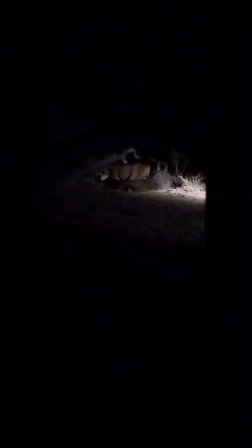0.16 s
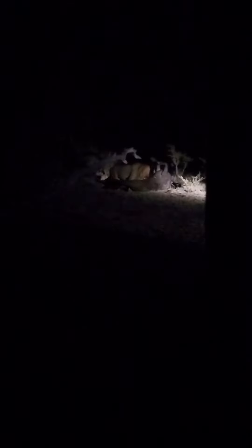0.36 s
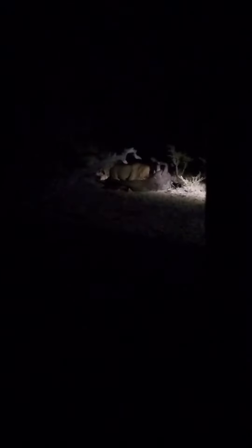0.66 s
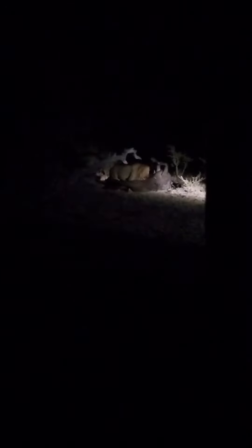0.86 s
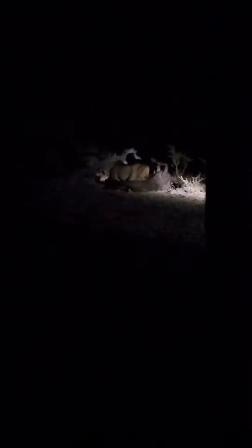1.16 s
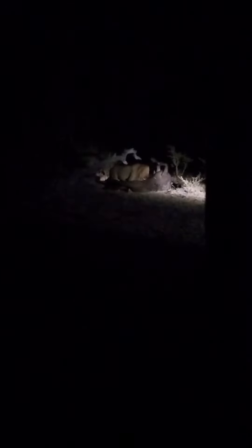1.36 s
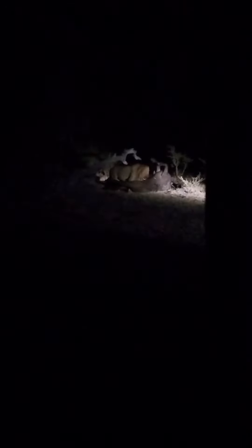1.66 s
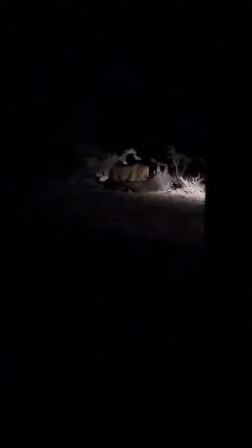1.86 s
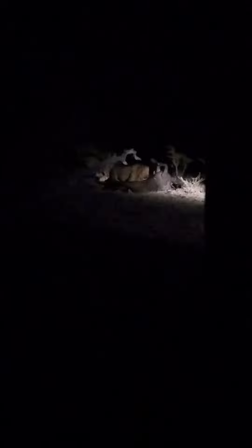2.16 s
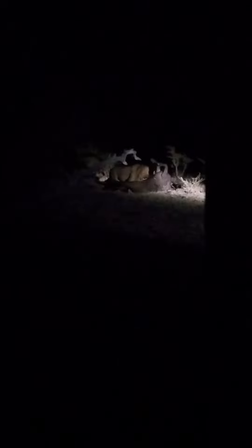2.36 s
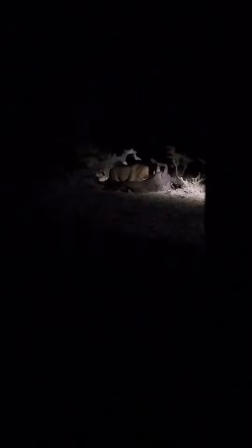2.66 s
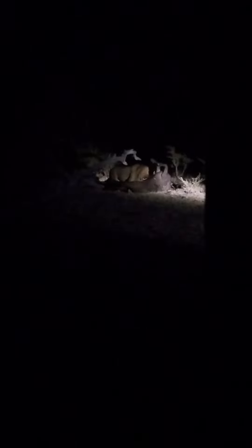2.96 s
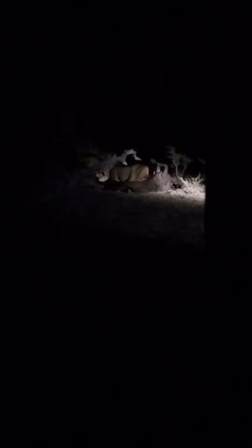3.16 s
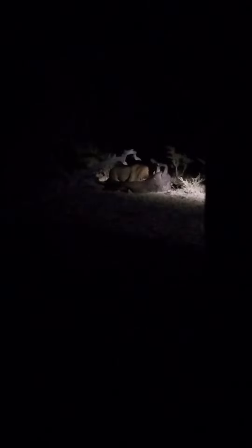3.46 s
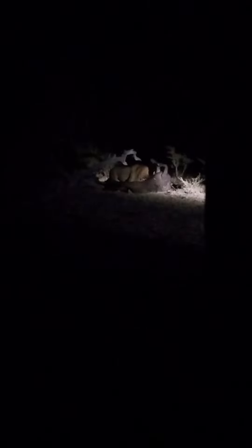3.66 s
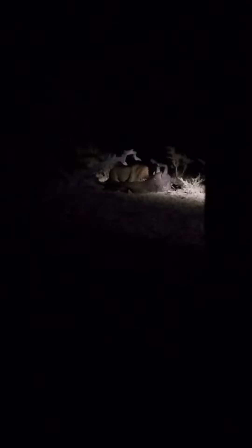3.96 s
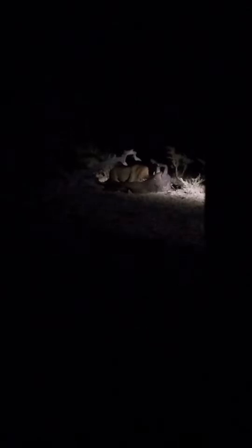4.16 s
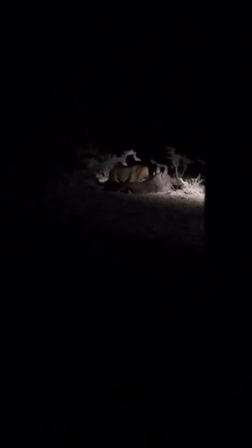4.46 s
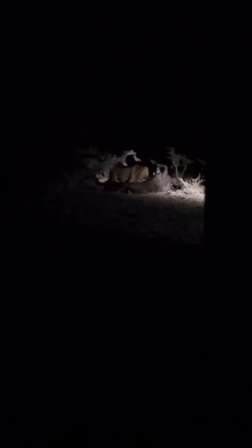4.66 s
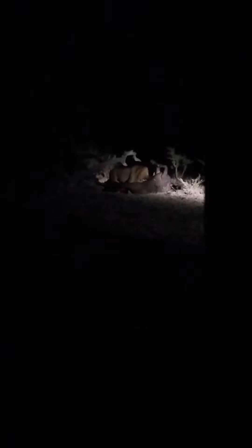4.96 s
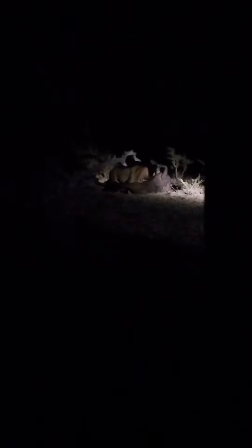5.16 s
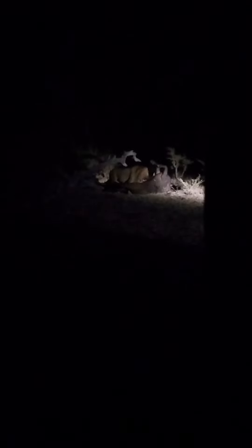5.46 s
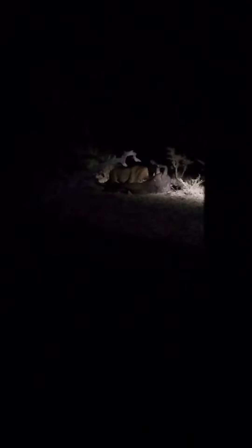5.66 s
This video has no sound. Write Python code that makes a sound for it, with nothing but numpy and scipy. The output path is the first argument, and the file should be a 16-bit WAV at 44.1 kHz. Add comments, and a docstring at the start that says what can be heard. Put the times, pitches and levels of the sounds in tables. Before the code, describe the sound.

Night outdoors, quiet low rumble and soft hush, with a barely audible, very high thin whine throughout. A lion, central and close, exhales softly from 0 to 0.45 s. At about 0.47 s it breaks into a violent open-jawed snarl: irregular hard throat snaps, chest thumps, ringing roary rasp and wet hissing spit, strongest around 0.5-1.1 s, briefly easing, then hitting again at 1.4 s and 1.7-1.9 s. As the jaws close, the snarl runs into deep rapid fluttering, about 25-30 beats a second, fading by 2.4 s. Light breath follows. At 2.9 s a darker, muffled growl builds, peaks near 3.1 s at about 20 beats a second and ebbs until 3.5 s. Faint distant falling chirps occur near 2.8, 3.5, 3.9, 4.7 and 5.7 s. Soft breathing fills the lull; from 4.9 s a much quieter growl swells to 5.3 s, slowing and fading.

```python
"""Soft breath over a low night rumble, then a lion snarls with open jaws as it guards its kill at night.
Its vocal folds snap shut unevenly: each closure is an impulse that sets the vocal tract ringing.
The jaws close and slack folds flap 14 to 32 times a second, in deep growls that build and ebb.
Turbulent breath noise drives the same tract resonances and hisses at the teeth.
Behind are shaped noise (the night), a thin high sine (a whine) and gliding sines (far, falling chirps)."""
import sys
import numpy as np
from scipy import signal
from scipy.fft import rfft, irfft
from scipy.io import wavfile
from scipy.ndimage import uniform_filter1d

SR = 44100
rng = np.random.default_rng(int(sys.argv[2]) if len(sys.argv) > 2 else 0)


def output_pcm(signal):
    """Save a mono or channel-first signal as 16-bit PCM at the path in sys.argv[1].

    Samples are clipped to [-1, 1] before scaling.
    """
    pcm = np.clip(np.atleast_2d(signal).T, -1, 1) * 32767
    wavfile.write(sys.argv[1], SR, np.round(pcm).astype(np.int16))


N = 255780
TIME = np.arange(N) / SR   # [s]
AGE = np.arange(SR // 5) / SR   # time since a pulse began [s]
ONSET = SR // 50   # pulses are levelled by the rms of their first 20 ms [samples]

# damping and strength of the six tract resonances, two of the throat, then four of the mouth:
# (bandwidth [Hz], relative level with jaws open [dB], relative level with jaws nearly shut [dB])
TRACT_MODES = [(21.6, -0.5, -10), (21.03, 0.5, -2.5), (23, 8, 7.5), (45.8, 6.5, 1), (65, 3, -10.5),
               (54.3, -3, -4)]
# spectrum of the hiss at the teeth: (frequency [Hz], relative density [dB per Hz])
TEETH_HISS = [(1500, -32.5), (2100, -4.5), (2600, -3.5), (3200, 0.5), (3900, -3.5), (5500, -4),
              (7500, -7.5), (10000, -12.5), (13000, -20.5), (15500, -35.5)]


def from_db(db):
    """An amplitude ratio is ten to the power of its level over twenty."""
    return 10 ** (np.asarray(db) / 20)


def rms_one(x):
    """Dividing by the root mean square normalises the mean power to 1."""
    return x / np.sqrt(np.mean(x ** 2) + 1e-20)


def butter(x, hz, kind, order=2):
    """A causal Butterworth filter has a maximally flat passband."""
    return signal.sosfilt(signal.butter(order, hz, kind, fs=SR, output="sos"), x)


def noise(spectrum):
    """Weighting the spectrum of white noise colours it; the result has rms 1."""
    hz, db = np.transpose(spectrum)
    f = np.maximum(np.fft.rfftfreq(N, 1 / SR), 1)
    density_db = np.interp(np.log(f), np.log(hz), db)
    below_first = np.minimum(f / hz[0], 1) ** 2   # roll-off under the lowest listed frequency
    gain = from_db(density_db) * below_first
    return rms_one(irfft(rfft(rng.standard_normal(N)) * gain, N))


def drift(rate):
    """Joining random values (unit spread), rate of them a second, gives a slow random modulation."""
    knots = rng.standard_normal(N // 20)
    return np.interp(TIME * rate, np.arange(len(knots)), knots)


def steady(x, span):
    """Dividing by the running rms over span seconds levels the random swells of a noise; rms about 1."""
    running_power = np.abs(uniform_filter1d(x * x, max(int(span * SR), 1)))
    return x / np.sqrt(running_power + 1e-12)


def add(out, s, sound):
    """Sounds superpose linearly: sum one in from time s."""
    i = int(s * SR)
    out[i:i + len(sound)] += sound[:N - i]


def at_level(pulse, db):
    """The level of a transient is set by the rms of its onset."""
    return from_db(db) * pulse / np.sqrt(np.mean(pulse[:ONSET] ** 2) + 1e-20)


def resonate(drive, hz, width_hz):
    """A damped oscillator with gliding centre: a unit click starts a decaying cosine of height 1."""
    turn = np.exp(2j * np.pi * np.cumsum(hz) / SR)
    decay = np.exp(-np.pi * width_hz / SR)   # per sample
    return np.real(turn * signal.lfilter([1], [1, -decay], drive / turn))


def scatter(x, t60, dull_hz):
    """Diffuse return from trees and ground: convolution with decaying noise of unit energy, low-passed."""
    age = np.arange(SR) / SR
    tail = rng.standard_normal(SR) * from_db(-60 * age / t60) * (1 - np.exp(-age / 0.013))
    tail = tail / np.sqrt(np.sum(tail ** 2))
    return butter(signal.fftconvolve(x, tail)[:N], dull_hz, "low")


def night():
    """Stationary noise with most power in the bass: a rumble and hush that swell a little."""
    # (frequency [Hz], relative density [dB per Hz])
    night_spectrum = [(25, 5), (60, -1.5), (140, -15.5), (370, -21), (600, -26), (1500, -36.5),
                      (3500, -43.5), (5700, -44), (9000, -47.5), (15500, -47)]
    night_db = -52.5
    swell_db = 0.71 * drift(1.8)
    return from_db(night_db) * noise(night_spectrum) * from_db(swell_db)


def whine():
    """A pure tone of constant amplitude: thin, steady and near the top of hearing."""
    # (frequency [Hz], rms level [dB])
    tones = [(14411, -91)]
    return sum(from_db(db) * rms_one(np.sin(2 * np.pi * hz * TIME)) for hz, db in tones)


def far_chirps():
    """Frequency-modulated sines: trembling calls that arch and fall, smeared by the bush they pass through."""
    # (start [s], top pitch before trembling [Hz], fall by 0.88 of the length [Hz], length [s],
    #  peak level before direct and scattered shares [dB])
    calls = [(2.785, 3590, 676, 0.071, -57), (3.499, 4530, 247, 0.053, -64.5),
             (3.948, 3760, 1284, 0.14, -61.5), (4.722, 3850, 993, 0.12, -64.5),
             (5.669, 3700, 600, 0.12, -64.5)]
    out = np.zeros(N)
    for s, top_hz, fall_hz, length, db in calls:
        u = np.clip((TIME - s) / length, 0, 1)   # progress through the call
        arch_hz = top_hz - fall_hz * ((u - .3) / 0.58) ** 2
        tremble_hz = 270 * drift(710)
        tone = np.sin(2 * np.pi * np.cumsum(arch_hz + tremble_hz) / SR)
        out += from_db(db) * np.sqrt(np.abs(np.sin(np.pi * u))) * tone
    return 0.54 * out + 0.62 * scatter(out, t60=0.32, dull_hz=5900)


def tract_hz(t):
    """Jaws, tongue and lips reshape the tract and so shift each resonance; frequencies at the times t."""
    # (untuned frequency with jaws open [Hz], with jaws nearly shut [Hz],
    #  exponent of throat tuning [1], exponent of mouth tuning [1])
    resonances = [(231.9, 215.6, 0.96, 0.097), (432.8, 398, -.1, 0), (775.6, 720, 0, 1),
                  (1009, 1150, 0, -.15), (1241, 1256, -0.13, .8), (1690, 2080, -0.11, .3)]
    # jaws go from open to nearly shut: (start [s], end [s])
    jaws_close = (1.62, 1.986)
    # tongue and lips: (time [s], throat tuning ratio [1], mouth tuning ratio [1])
    tuning = [(0.499, 1.33, 1.11), (.64, 0.74, 0.85), (.73, 1.01, 0.9), (0.779, 1.4, 0.98),
              (.86, 0.98, 0.88), (0.912, 0.98, 1.16), (0.958, 1, 0.87), (1.046, 0.89, .88),
              (1.076, 1.09, 1.12), (1.2, 1.0, 1.12), (1.38, 1.144, 1.012), (1.61, 1.25, 1.12),
              (1.862, 1.02, 1.326), (1.98, 1.35, 0.94), (2.15, 1.14, 0.95), (2.37, 0.96, 0.88),
              (2.93, 0.97, 1.11), (3.12, 0.69, .99), (3.499, 0.81, 0.94), (4.4, 1.1, 1.14),
              (4.95, 1.2, 1.85), (5.2, 0.85, 1.74), (5.32, 1.21, 1.56)]
    s, *ratios = np.transpose(tuning)
    throat, mouth = [np.interp(t, s, ratio) for ratio in ratios]
    shut = np.interp(t, jaws_close, [0, 1])
    return [(open_hz + shut * (shut_hz - open_hz)) * throat ** by_throat * mouth ** by_mouth
            for open_hz, shut_hz, by_throat, by_mouth in resonances]


def tract_ring(s, jaw):
    """Impulse response of throat and mouth: damped cosines after a closure; jaw 0 is open, 1 nearly shut."""
    rings = []
    for hz, (width_hz, *level_db) in zip(tract_hz(s + AGE), TRACT_MODES):
        phase = 2 * np.pi * np.cumsum(hz) / SR
        gain = from_db(level_db[jaw] + 2 * rng.normal())   # closures differ by chance
        rings.append(gain * np.exp(-np.pi * width_hz * AGE) * np.cos(phase))
    return sum(rings[:2]), sum(rings[2:])


def chest_thump(hz, swell, lead):
    """Air through the folds swells before closure (lead seconds in), then swings as a damped oscillation."""
    wave = AGE ** 2 * np.exp(-AGE / swell) * np.cos(2 * np.pi * hz * (AGE - lead))
    after_closure = wave[int(lead * SR):][:ONSET]
    return wave / np.sqrt(np.mean(after_closure ** 2))


def muzzle(drive, stretch):
    """A longer cavity resonates lower: stretching the muzzle divides all its high resonances alike."""
    # (frequency at stretch 1 [Hz], bandwidth [Hz], relative level [dB])
    muzzle_modes = [(2450, 220, 8.5), (2930, 62, -10), (3220, 48, -2), (4910, 140, -0.5), (5600, 160, -6.5),
                    (7100, 450, -4.5)]
    rings = []
    for hz, width_hz, db in muzzle_modes:
        ring = resonate(drive, np.full(len(drive), hz / stretch), width_hz)
        rings.append(from_db(db) * np.sqrt(width_hz) * ring)
    return sum(rings)


def spit(hiss, s, swell, plain):
    """A burst of turbulence around one closure, partly plain hiss, partly ringing in the muzzle."""
    puff = np.roll(hiss, rng.integers(N))[:len(AGE)] * AGE * np.exp(-AGE / swell)
    stretch = np.interp(s, [3.5, 5.3], [1, 1.07])   # the head is lowered for the last growl
    return at_level(muzzle(puff, stretch), 0) + plain * at_level(puff, 0)


def saliva(per_s, width_hz, spread_db):
    """Films of saliva tear at random times; each rings as a brief damped oscillator at its own pitch."""
    out = np.zeros(N)
    age = AGE[:2 * ONSET]
    for when, pitch, size, phase in rng.random((int(per_s * N / SR), 4)):
        hz = 1600 * 5.0 ** pitch
        envelope = (1 - np.exp(-age / 0.0024)) * np.exp(-np.pi * width_hz * age)
        ring = envelope * np.cos(2 * np.pi * (hz * age + phase))
        add(out, when * N / SR, from_db(spread_db * size - 8.0 * pitch) * ring)
    return steady(out, 0.029)


def fold_beats():
    """Listed flapping rates time the beats, and effort sets their levels; yields (time, then four dB)."""
    # (time of greatest effort [s], build-up [dB/s], ebb [dB/s], ebb of the mouth [dB/s], then
    #  relative levels at greatest effort: chest [dB], throat [dB], mouth [dB], spit [dB])
    growls = [(1.949, 98, 172, 30, -22, -36, -58, -47.5), (2.2, 84, 96, 100, -22.5, -27, -38.5, -50),
              (3.121, 98, 41.5, 10, -24.5, -32.5, -50.5, -55.5), (5.33, 54, 64, 43, -37.5, -46, -61, -60.5)]
    # one curve for each stretch of growling; the first two run on as one growl:
    # (time [s], flapping rate [beats/s])
    flap_rates = [
        [(1.911, 26.1), (1.949, 31.6), (2.02, 30)],
        [(2.043, 25.6), (2.082, 28.6), (2.153, 27.2), (2.374, 18.1)],
        [(2.912, 20.0), (3.01, 23.6), (3.234, 19.8), (3.5, 19.2)],
        [(4.912, 17.2), (5.026, 18.65), (5.223, 22.9), (5.706, 13.9)],
    ]
    # share of the build-up that each part follows: (chest [1], throat [1], mouth [1], spit [1])
    build_shares = (0.55, 1.0, 0.18, 0.3)
    chest_ebb_share, spit_ebb_share = 0.32, 0.92
    for (peak_s, build, ebb, mouth_ebb, *peak_db), rates in zip(growls, flap_rates):
        rising = build * np.array(build_shares)
        falling = np.array([chest_ebb_share * ebb, ebb, mouth_ebb, spit_ebb_share * ebb])
        times, per_s = np.transpose(rates)
        s = times[0]
        while s < times[-1]:
            before, after = max(peak_s - s, 0), max(s - peak_s, 0)
            yield s, *(peak_db - rising * before - falling * after)
            s += 1 / np.interp(s, times, per_s)


def breath_levels():
    """Breath flow swells, holds and decays linearly in dB; rows are chest, throat, mouth and hiss."""
    # (time of full strength [s], attack [s], hold [s], release before stretch [s], then relative
    #  full levels: chest [dB], throat [dB], mouth [dB], hiss at the teeth [dB])
    breaths = [(0.0, .05, 0.025, 0.22, -45, -48, -50, -69), (0.137, 0.21, 0.35, .1, -61, -57, -63, -72.5),
               (0.511, 0.051, 0.038, 0.03, -27, -22.5, -39, -50),
               (0.66, 0.14, 0.083, 0.051, -18.5, -14, -23, -30),
               (0.905, 0.068, .045, 0.025, -25.5, -18.5, -31.5, -35.5),
               (1.027, 0.066, 0.026, 0.062, -25, -23, -33, -45),
               (1.174, 0.059, 0.095, 0.078, -43, -34, -44.5, -52),
               (1.376, 0.044, 0.027, 0.11, -26, -39.5, -43.5, -54),
               (1.731, 0.11, 0.027, 0.075, -28, -27, -39.5, -46),
               (1.868, 0.085, .1, 0.1, -26.5, -29.5, -37, -47),
               (2.024, 0.044, 0.016, 0.38, -34, -38, -45, -50),
               (2.531, 0.22, 0.19, 0.19, -54, -45.5, -56.5, -63.5),
               (2.916, 0.058, 0.105, 0.13, -45, -51, -49, -54.5),
               (3.062, 0.21, 0.33, 0.33, -37.5, -58.5, -65.5, -71),
               (3.674, 0.17, 0.11, 0.19, -58, -46.5, -57.5, -67),
               (3.965, 0.83, .17, 0.21, -61, -52.5, -64.5, -73.5),
               (4.358, 0.15, 0.033, 0.26, -67, -54.5, -69.5, -76),
               (4.974, 0.076, 0.18, .14, -65, -57, -55, -65.5),
               (5.16, 0.18, 0.091, 0.5, -50, -49, -54.5, -62)]
    # release stretch, longest in the throat: (chest [1], throat [1], mouth [1], hiss [1])
    lingers = (1.11, 1.39, 0.82, 0.93)
    fade_db = 21.5   # drop over one attack or stretched release time
    levels = np.full((len(lingers), N), -np.inf)
    for s, attack, hold, release, *full_db in breaths:
        early = np.maximum(s - TIME, 0) / attack
        late = np.maximum(TIME - s - hold, 0) / release
        for k, (db, linger) in enumerate(zip(full_db, lingers)):
            levels[k] = np.maximum(levels[k], db - fade_db * (early + late / linger))
    return levels


def rasping_breath():
    """Turbulence, chopped by fluttering tissue, excites the tract resonances and hisses past the teeth."""
    chest_db, throat_db, mouth_db, hiss_db = breath_levels()
    flutter = from_db(2.8 * drift(170))
    air = rng.standard_normal(N) * flutter
    rings = []
    for hz, (width_hz, open_db, _) in zip(tract_hz(TIME), TRACT_MODES):
        # the jet wanders, so each resonance flares and fades on its own
        flare = from_db(6 * drift(30))
        ring = steady(resonate(air, hz, 1.15 * width_hz), 0.0256)
        rings.append(from_db(open_db) * flare * ring)
    # a hard blow makes the resonances sing; a soft breath is mostly plain rush
    effort = np.clip((np.maximum(throat_db, mouth_db) + 56) / 26, .08, 1)
    chest = steady(butter(rng.standard_normal(N), [48, 140], "band"), 0.0216)
    throat = sum(rings[:2]) * effort + 0.51 * rms_one(butter(air, [200, 540], "band"))
    throat = steady(butter(throat, 425, "low", order=4), 0.019)
    mouth = sum(rings[2:]) * effort + 0.06 * rms_one(butter(air, [850, 2000], "band"))
    mouth = steady(butter(mouth, [800, 2500], "band"), 0.11)
    wet = saliva(per_s=210, width_hz=34, spread_db=18.0)
    hiss = rms_one(noise(TEETH_HISS) * flutter + 0.71 * wet + 0.54 * rms_one(muzzle(air, 0.86)))
    # each growl beat of the folds lets a gust through
    gusts = np.zeros(N)
    for s, *_ in fold_beats():
        add(gusts, s - .003, np.hanning(2 * ONSET))
    rush = mouth * from_db(mouth_db - 3.5) + hiss * from_db(hiss_db - 0.16)
    rush = rush * from_db(5.8 * gusts)
    return chest * from_db(chest_db - 0.5) + throat * from_db(throat_db - 4.5) + rush


def growl_beats():
    """Slack folds close softly: weak excitation, so chest thump and slow heave outweigh knock and hiss."""
    # the lips muffle the mouth as they close, less as they part: (time [s], cut-off [Hz])
    lips = [(2.97, 1620), (3.10, 770), (3.50, 720), (5.0, 1915)]
    out, hiss = np.zeros(N), noise(TEETH_HISS)
    knock = np.exp(-AGE / 0.0041) * np.cos(2 * np.pi * 360 * AGE)
    lead = 0.0074   # the thump begins this long before closure [s]
    for s, chest_db, throat_db, mouth_db, spit_db in fold_beats():
        throat, mouth = tract_ring(s, jaw=1)
        throat = butter(throat + knock, 465, "low", order=4)
        throat = at_level(throat, throat_db + 0.11)
        lip_hz = np.interp(s, *np.transpose(lips))
        mouth = butter(butter(mouth, lip_hz, "low", order=5), 1170, "high")
        mouth = at_level(mouth, mouth_db + 0.16)
        thump = chest_thump(93 * (1 + 0.11 * rng.normal()), swell=0.005, lead=lead)
        heave = chest_thump(52.6, swell=0.013, lead=lead)
        add(out, s - .001, throat + mouth)
        add(out, s - .003, at_level(spit(hiss, s, swell=0.0039, plain=0.34), spit_db + .5))
        add(out, s - lead, from_db(chest_db + 0.05) * (thump + 0.32 * heave))
    return out


def snarl_snaps():
    """Abrupt closure is a wideband impulse: a pressure spike and a thump, and the open tract rings on."""
    # levels before fixed trims and filters:
    # (time [s], chest level [dB], throat level [dB], mouth level [dB])
    snaps = [(0.469, -23, -27.5, -36), (0.501, -23, -12.5, -22.5), (0.535, -14.5, -18, -26),
             (0.61, -25, -25.5, -25), (0.646, -18, -23.5, -34.5), (0.674, -22, -17, -30.5),
             (0.747, -15, -16, -25), (0.845, -35, -40, -47), (0.884, -18.5, -27.5, -32.5),
             (0.91, -20, -29.5, -33.5), (0.953, -42, -26, -36.5), (1.013, -15.5, -13, -18),
             (1.043, -23, -32.5, -48.5), (1.076, -20, -25.5, -23), (1.18, -44, -75, -36.5),
             (1.207, -27, -50, -45.5), (1.375, -18, -14.5, -19.5), (1.408, -21, -15.5, -19.5),
             (1.445, -25, -23, -31.5), (1.58, -39, -44, -48), (1.605, -32.5, -30, -42.5),
             (1.731, -25.5, -28.5, -36), (1.872, -19.5, -20.5, -22), (1.984, -29, -26.5, -54),
             (2.886, -41, -42, -68)]
    out, hiss = np.zeros(N), noise(TEETH_HISS)
    spike = np.exp(-AGE / 0.0046) * np.cos(2 * np.pi * 340 * AGE)
    crack = np.exp(-AGE / 0.00051) * np.cos(2 * np.pi * 1300 * AGE)
    closing = 1 - np.exp(-AGE / 0.00013)   # the folds take a moment to seal
    lead = 0.0028   # the thump begins this long before closure [s]
    for s, chest_db, throat_db, mouth_db in snaps:
        spit_db = -19.5 + 0.81 * mouth_db   # the spit grows with the mouth level
        throat, mouth = tract_ring(s, jaw=0)
        throat = at_level(throat + 1.8 * spike, throat_db + .5)
        throat = butter(throat, 940, "low")
        mouth = at_level(mouth + 1.8 * crack, mouth_db + 0.33)
        mouth = butter(butter(mouth, 1200, "low"), 350, "high")
        thump = chest_thump(80 * (1 + 0.19 * rng.normal()), swell=0.0027, lead=lead)
        add(out, s, (throat + mouth) * closing)
        add(out, s - .004, at_level(spit(hiss, s, swell=0.0043, plain=1.3), spit_db - 5.0))
        add(out, s - lead, from_db(chest_db - 2.5) * thump)
    return out


def scene():
    """Identical channels place the image centrally: the lion is straight ahead, with a diffuse return."""
    background = night() + whine() + far_chirps()
    lion = rasping_breath() + growl_beats() + snarl_snaps()
    lion_return = from_db(-32.5) * scatter(lion, t60=0.51, dull_hz=2546)
    mix = background + lion + lion_return
    return np.array([mix, mix])


def record(dry):
    """Soft saturation rounds the loudest peaks, and a steep elliptic low-pass cuts the top."""
    cutoff_hz = 15700
    rounded = 1.3 * np.tanh(dry / 1.3)
    # 0.1 dB ripple, 80 dB rejection
    return signal.sosfilt(signal.ellip(10, .1, 80, cutoff_hz, fs=SR, output="sos"), rounded)


dry = scene()
out = record(dry)
output_pcm(out)
```